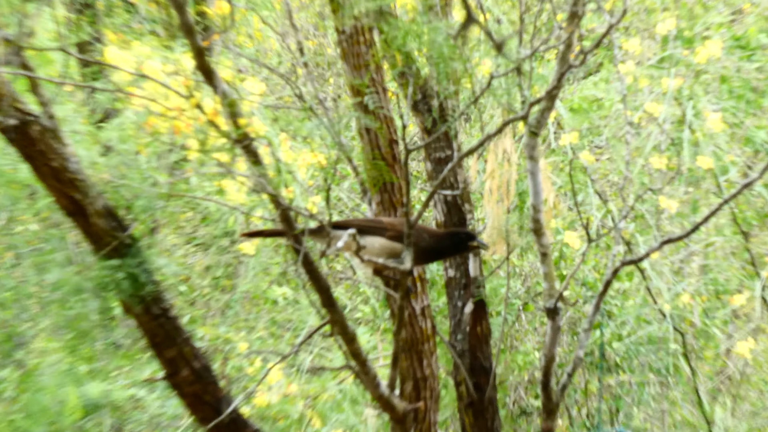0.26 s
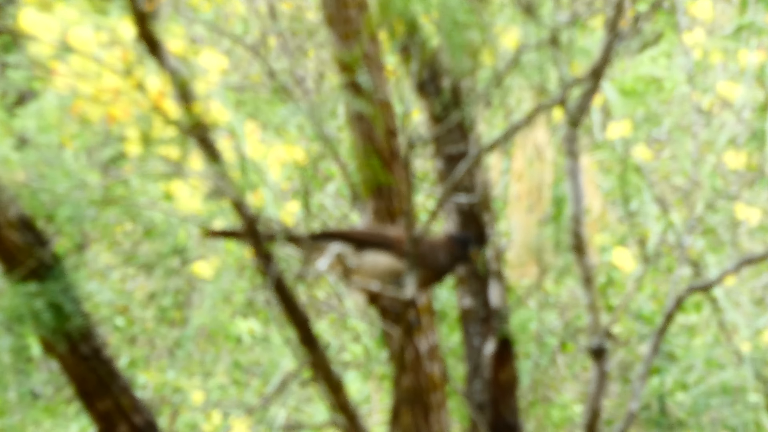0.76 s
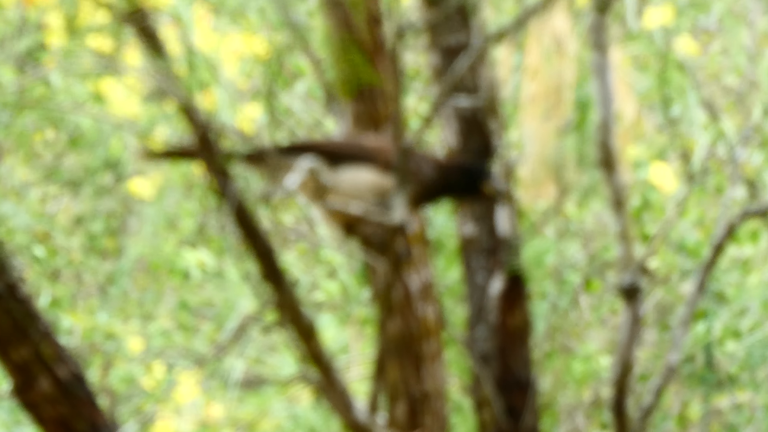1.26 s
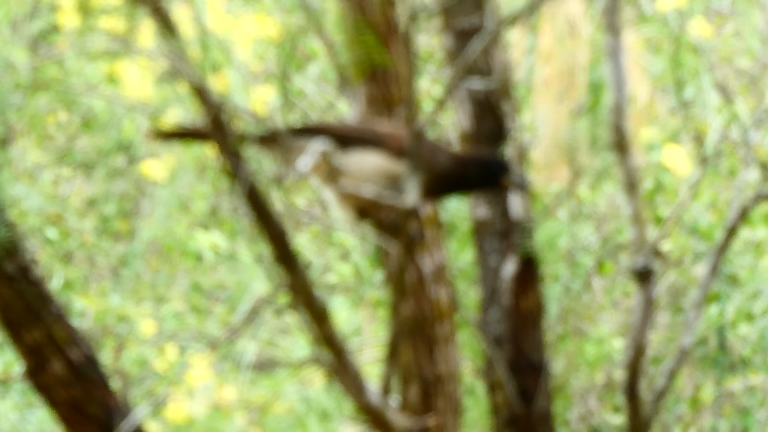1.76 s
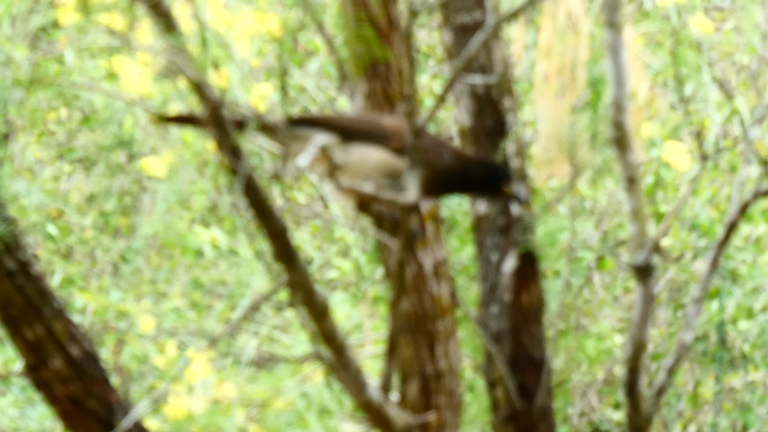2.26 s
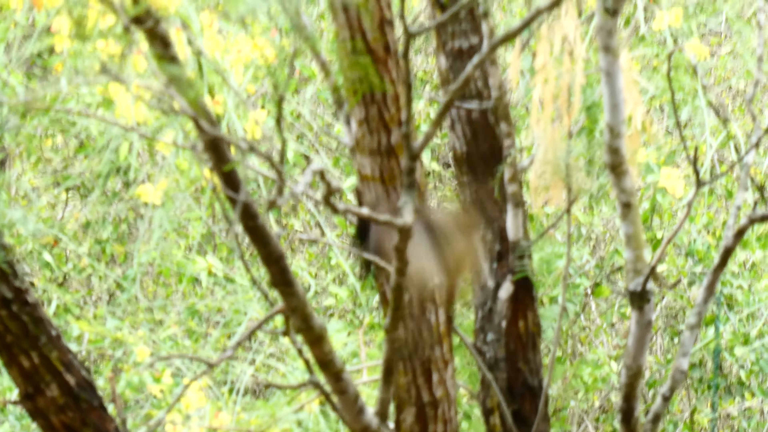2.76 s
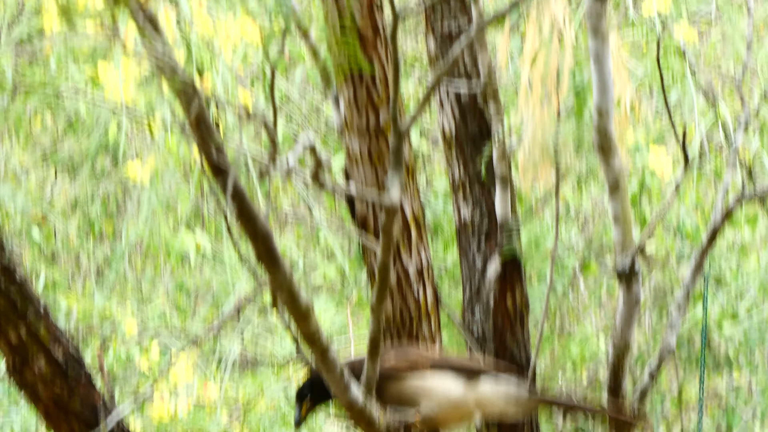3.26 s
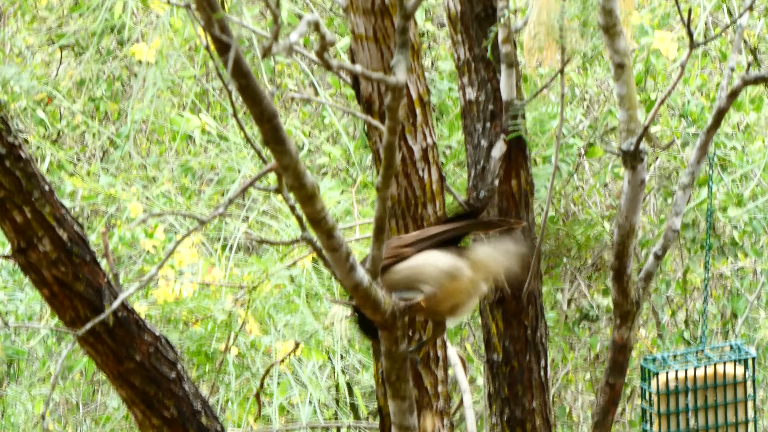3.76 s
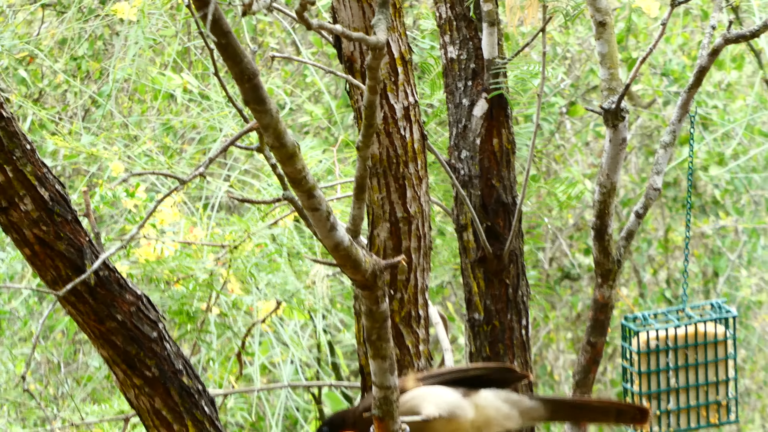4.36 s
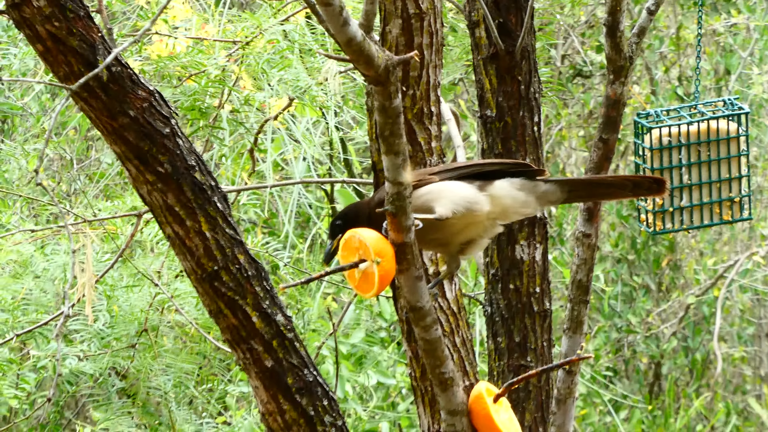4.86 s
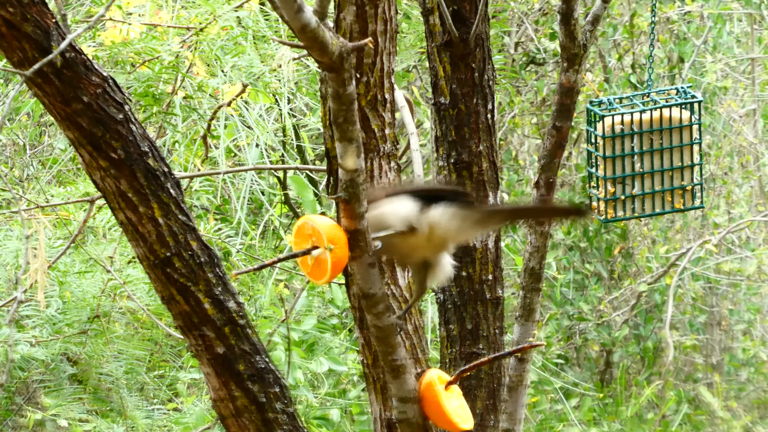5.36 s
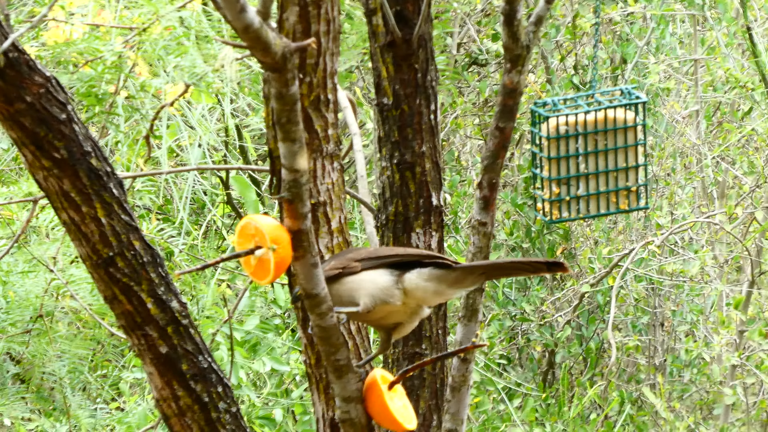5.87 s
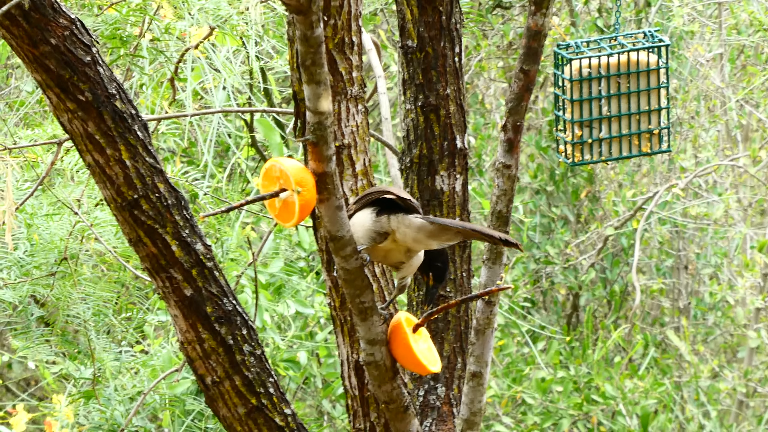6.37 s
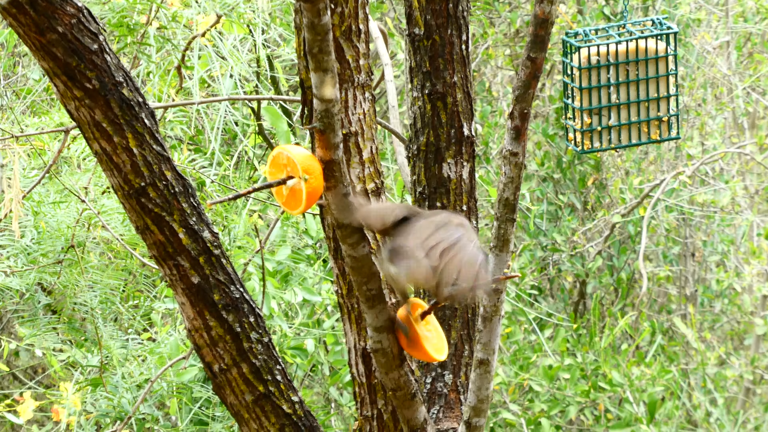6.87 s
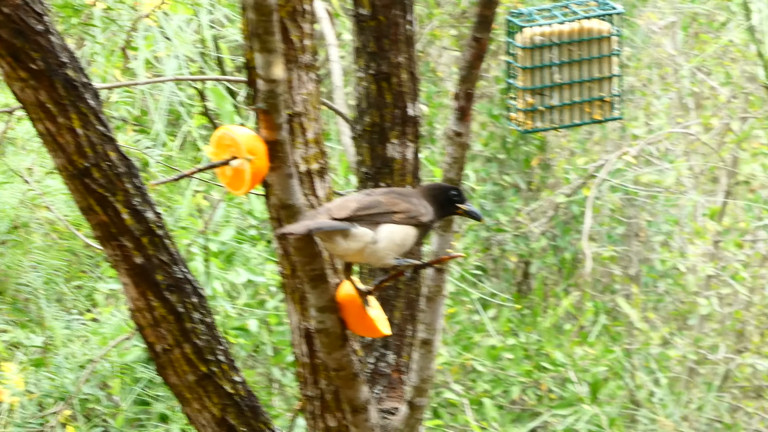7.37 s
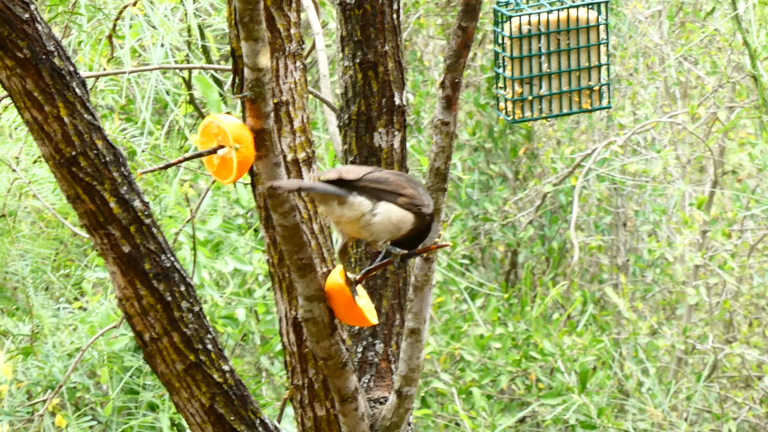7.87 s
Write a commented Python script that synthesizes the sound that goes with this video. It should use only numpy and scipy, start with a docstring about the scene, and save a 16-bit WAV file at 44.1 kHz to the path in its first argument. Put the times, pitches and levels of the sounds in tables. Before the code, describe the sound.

A jay screams harshly four times in a thicket, then hops with wing flutters and small knocks while distant songbirds chirp over soft hiss and hum.

```python
"""A jay in a thicket screams four times: a rasp, then a falling nasal note, then a growl, all one
harmonic stack that roughens and clears. It then hops about a feeder with flicks of its wings, made
of shaped noise, among ticks and knocks. Small songbirds, made of gliding sines, whistle farther off.
Filtered noise makes a soft hiss; noise and a wavering sine make a faint throbbing hum."""
import sys
import numpy as np
from scipy import signal
from scipy.fft import rfft, irfft, next_fast_len
from scipy.io import wavfile
from scipy.ndimage import uniform_filter1d, map_coordinates

SR = 44100
rng = np.random.default_rng(int(sys.argv[2]) if len(sys.argv) > 2 else 0)


def digitize_waveform(pressure):
    """Quantize a signal to 16-bit integers and store it at the path in sys.argv[1].

    Rows of a 2-D input are taken as channels; values are limited to [-1, 1].
    """
    field = np.atleast_2d(pressure).T
    bounded = np.clip(field, -1, 1)
    quanta = np.round(bounded * 32767).astype(np.int16)
    wavfile.write(sys.argv[1], SR, quanta)


N = 357651
TIME = np.arange(N) / SR


def amp(db):
    """Decibels to an amplitude factor."""
    return 10 ** (np.asarray(db) / 20)


def unit(x):
    """x at rms 1."""
    return x / np.sqrt(np.mean(x ** 2) + 1e-20)


def along(points, hz):
    """(hz, value) points read on a log frequency axis."""
    f, v = np.transpose(points)
    return np.interp(np.log(hz + 1), np.log(f + 1), v)


def over_time(points, t):
    """(time_s, value) points read at the times t."""
    s, v = np.transpose(points)
    return np.interp(t, s, v)


def wobble(rate, size):
    """Smooth random curve, rate knots a second."""
    knots = rng.standard_normal(size // 4)
    return map_coordinates(knots, [np.arange(size) * rate / SR], mode="wrap")


def turning(hz):
    """Phase in radians of a tone whose pitch is hz at each sample."""
    return 2 * np.pi * np.cumsum(hz) / SR


def filtered(x, response):
    """x times a response of frequency."""
    size = x.shape[-1]
    m = next_fast_len(size + 4096)
    return irfft(rfft(x, m) * response(np.fft.rfftfreq(m, 1 / SR)), m)[..., :size]


def coloured(x, spectrum):
    """x shaped by (hz, relative_db) points, at rms 1."""
    return unit(filtered(x, lambda hz: amp(along(spectrum, hz))))


def add(track, s, x):
    """Mix x into the track at time s."""
    part = track[max(round(s * SR), 0):][:len(x)]
    part += x[:len(part)]


def ramp(x, centre, width):
    """Rises from 0 to 1 over a width around the centre."""
    return np.clip((x - centre) / width + .5, 0, 1)


ATTACK_S, ATTACK_DB, ATTACK_SCOOP_SHARE = 0.043, 23.5, 0.12  # rise of the rasp's level and pitch
RASP_HZ = 1198.6  # reached at the end of the attack
STAGE_FLIP_S = 0.017
ROUGHNESS_DECAY_S = 0.014  # the rasp's roughness lingers into the note
NOTE_ARCH_HZ = 11.4  # the note holds its pitch at first, then sags faster
OPEN_AT_SHARE, OPEN_OVER_SHARE = 0.46, 0.41  # low resonance's entry, in shares of the note
SWELL_DB, SWELL_AT_SHARE, SWELL_WIDTH_SHARE = 5.5, 0.42, 0.17  # upper resonances' bloom in the note
GROWL_HZ, GROWL_SAG_HZ_PER_S, GROWL_FADE_DB_PER_S, GROWL_ROUGH = 892.6, 450, 82.5, 0.52
# balance of each stage, relative to its level: fundamental_db, low_db, middle_db, high_db
RASP_MIX = (-32, -0.2, -10.5, -4.5)
NOTE_START_MIX = (-14.5, -1.5, -4.5, -1.1)
NOTE_END_MIX = (-14, 2.6, -3.5, -9)
GROWL_MIX = (-13.5, -2.6, -12.5, -7.5)


def gesture(t, call, flicker_db=2.5, flicker_rate=80, drift=0.0041, lurch=0.0346):
    """Pitch, roughness and levels of a scream: swelling rasp, sagging note, fading growl."""
    (start, clear, crack, end, first_hz, last_hz, rasp_db, first_db, last_db, growl_db,
     held_db, lift_db, rasp_rough, note_rough) = call
    cleared = ramp(t, clear, STAGE_FLIP_S)
    broken = ramp(t, crack, STAGE_FLIP_S)

    def staged(rasp, note, growl):
        return rasp + cleared * (note - rasp) + broken * (growl - note)

    unready = np.clip(1 - (t - start) / ATTACK_S, 0, 1)
    u = np.clip((t - clear) / (crack - clear), 0, 1)  # progress through the note
    growling_s = t - crack

    note_hz = first_hz + u * (last_hz - first_hz) + NOTE_ARCH_HZ * np.sin(np.pi * u)
    rasp_hz = RASP_HZ * (1 - ATTACK_SCOOP_SHARE * unready)
    pitch = staged(rasp_hz, note_hz, GROWL_HZ - GROWL_SAG_HZ_PER_S * growling_s)

    lingering = np.exp(-np.maximum(t - clear, 0) / ROUGHNESS_DECAY_S)
    rough = staged(rasp_rough + unready, note_rough + rasp_rough * lingering, GROWL_ROUGH)

    rasp = np.add.outer(RASP_MIX, rasp_db - ATTACK_DB * unready)
    note = np.outer(np.add(NOTE_START_MIX, first_db), 1 - u) + np.outer(np.add(NOTE_END_MIX, last_db), u)
    note[1] -= held_db * (1 - ramp(u, OPEN_AT_SHARE, OPEN_OVER_SHARE))
    note[2:] += SWELL_DB * np.exp(-((u - SWELL_AT_SHARE) / SWELL_WIDTH_SHARE) ** 2)
    growl = np.add.outer(GROWL_MIX, growl_db - GROWL_FADE_DB_PER_S * growling_s)
    levels = staged(rasp, note, growl)
    levels[3] += lift_db

    # the rougher the voice, the more its pitch lurches about
    pitch = pitch * (1 + (drift + lurch * rough) * wobble(70.03, len(t)))
    return [pitch, rough] + [db + flicker_db * wobble(flicker_rate, len(t)) for db in levels]


# throat and beak response: hz, relative_db
THROAT = [(700, -82), (1300, 1), (1480, 3.5), (1800, 13.5), (2400, 10), (4400, 0.5), (5400, -9),
          (6800, -23.5), (8800, -15.5), (11500, -25), (15500, -42)]
# crossovers between neighbouring resonances: fade_from_hz, fade_to_hz
CROSSOVERS = [(2560, 2870), (3660, 3890)]


def scream(call, jitter=0.0467, jitter_rate=710, uneven_db=1.5, blur=0.015, half_share=0.66,
           rasp=0.59, growl_hz=105, growl_depth=0.52):
    """One call: a harmonic stack that doubles its period and breaks into a growl as it roughens."""
    start, _, _, end = call[:4]
    t = np.arange(max(start, 0), end, 1 / SR)
    size = len(t)
    pitch, rough, fundamental_db, *levels = gesture(t, call)
    rough = np.clip(rough, 0, 1)
    pitch = pitch * (1 + jitter * rough * wobble(jitter_rate, size) + 0.0076 * wobble(204, size))
    phase = turning(pitch)

    def overtone(k):
        """Partial k wanders and comes and goes on its own; upper ones blur into bands."""
        wander = (blur * k ** 2 + 0.58 * k * rough) * wobble(222.6, size)
        return np.sin(k * phase + wander) * amp(uneven_db * min(k / 4, 1) * wobble(71.5, size))

    stack = sum(overtone(k) + half_share * rough * overtone(k + .5) for k in range(2, 16))
    hiss = rng.standard_normal(size) * (1 + np.cos(phase))  # turbulence comes once a cycle
    growl_phase = turning(growl_hz * (1 + 0.154 * wobble(59.3, size)))
    growl = 1 + growl_depth * rough * np.sin(growl_phase)
    voice = coloured((unit(stack) + rasp * (rough ** 2 + 0.032) * hiss) * growl, THROAT)

    # the beak's opening shares the overtones among the resonances
    below = [filtered(voice, lambda hz: np.interp(hz, edge, [1, 0])) for edge in CROSSOVERS]
    bands = np.diff([np.zeros(size), *below, voice], axis=0)
    sound = np.zeros(size)
    for band, db in zip(bands, levels):
        running_rms = np.sqrt(np.abs(uniform_filter1d(band ** 2, size=700)) + 1e-9)
        sound += amp(db) * band / running_rms
    # the weak, fairly pure fundamental skips the resonances, slightly flat of the stack
    sound = sound + np.sqrt(2) * amp(fundamental_db) * overtone(0.97) * growl
    return sound * np.clip((t - t[0]) / 0.00061, 0, 1) * np.clip((t[-1] - t) / 0.059, 0, 1)


# screams: start_s (negative: already under way), clear_s, crack_s (into the growl), end_s,
# first_hz, last_hz (of the note), rasp_db, first_db, last_db (of the note), growl_db,
# held_db (low resonance kept down early in the note), lift_db (high resonance),
# rasp_rough, note_rough (0-1)
SCREAMS = [(-0.06, 0.044, 0.176, 0.43, 1108, 1012, -28, -34, -33.5, -33.5, 22, 1, 0.17, 0.059),
           (0.725, 0.805, 0.988, 1.032, 1027, 919, -31.5, -37.5, -39, -41, 13, 0, 0.51, 0.11),
           (1.272, 1.342, 1.474, 1.7, 1117, 987, -32, -36, -30, -32, 10, 1.5, 0.53, 0.084),
           (1.876, 1.965, 2.076, 2.24, 1026, 980.4, -27, -37, -28.5, -32, -2, -0.5, 0.4, 0.072)]


def jay():
    """The jay's voice: four screams."""
    out = np.zeros(N)
    for call in SCREAMS:
        add(out, call[0], scream(call))
    return out


THROB_HZ, THROB_WANDER_HZ = 11.44, 0.3
# hum level before hum_db: time_s, level_db
HUM_LEVEL = [(0.0, -57.5), (0.8, -62), (2.81, -54), (6.3, -58), (8.0, -52)]
# noise part of the hum: hz, relative_db
HUM_BAND = [(450, -63), (580, -9.5), (660, -1.5), (700, -2.5), (760, 0), (830, -24.5), (950, -89)]
# throb swing either way: time_s, depth_db
THROB_DEPTH = [(0, 4.5), (2, 6.5), (5, 3.5), (6.5, 3.5)]


def hum(line_hz=695, line_db=1, hum_db=-1, waver_db=0.9):
    """A fuzzy tone near 700 Hz, band noise plus a sine, that wavers and throbs about 11 times a second."""
    rate = THROB_HZ + THROB_WANDER_HZ * wobble(2.14, N)
    swing_db = over_time(THROB_DEPTH, TIME) * np.cos(turning(rate))
    throb = unit(amp(swing_db + waver_db * wobble(6, N)))
    line = np.sin(turning(line_hz + 20 * wobble(50, N)))
    tone = unit(coloured(rng.standard_normal(N), HUM_BAND) + amp(line_db) * line)
    return amp(over_time(HUM_LEVEL, TIME) + hum_db) * throb * tone


# hiss spectra: hz, relative_db
AIR_LOW = [(25, -58), (45, -39), (70, -29.5), (160, -3.5), (260, -6), (400, 3.5), (520, 7.5), (850, 5),
           (1080, -1.5), (1230, 5), (1450, -5), (1900, -4.5), (2300, -19)]
AIR_HIGH = [(1600, -11), (2100, 4.5), (2900, 2.5), (3600, -6), (4600, -2), (5500, 5), (6400, -5),
            (7100, -1.5), (8000, 4.5), (8700, 6.5), (9700, -4), (12500, -9), (15500, -13.5)]
# left-right likeness of the hiss: hz, correlation
ALIKE = [(60, -0.053), (110, 0.28), (200, -0.46), (380, 0.23), (700, 0.49), (1290, 0.56), (2380, 0.84),
         (4400, 0.97), (8120, 0.96), (15000, 0.19)]


def air(spectrum):
    """Steady stereo noise of rms 1; the mid-side balance sets the ears' likeness."""
    mid, side = rng.standard_normal((2, N))

    def turn(hz):
        return np.arccos(np.clip(along(ALIKE, hz), -1, 1)) / 2

    mid = filtered(mid, lambda hz: np.cos(turn(hz)))
    side = filtered(side, lambda hz: np.sin(turn(hz)))
    return coloured(np.array([mid + side, mid - side]), spectrum)


# small sharp ticks: start_s, level_db (before trim_db), ring_hz
TICKS = [(0.4225, -46.5, 10600), (0.6162, -44, 10300), (1.1723, -46.5, 9900), (4.3214, -54, 10300),
         (5.881, -50, 9700), (5.996, -33, 9200)]


def ticks(t60=0.0096, trim_db=1):
    """Bright ticks of beak and claws: decaying noise peaked at the ring."""
    out, t = np.zeros(N), np.arange(SR // 10) / SR
    for s, db, hz in TICKS:
        peak = [(hz / 2, -24), (hz * 0.9, -20), (hz, 0), (hz * 1.33, -2), (hz * 1.6, -22)]
        ring = coloured(rng.standard_normal(len(t)), peak)
        add(out, s, amp(db + trim_db - 60 * t / t60) * ring)
    return out


def whistle(pitch, waver_db=3, waver=0.011):
    """A thin, unsteady sine that swells and fades."""
    size = len(pitch)
    swell = np.sqrt(np.abs(np.sin(np.linspace(0, np.pi, size))))
    tone = np.sin(turning(pitch * (1 + waver * wobble(153.0, size))))
    return swell * amp(waver_db * wobble(101, size)) * tone


FLUTTER_HZ, FLUTTER_DB, FLUTTER_PITCH_SHARE = 62.4, 3.5, 0.02
# short notes: start_s, length_s, start_hz, end_hz, level_db (before the far mix)
NOTES = [(0.55, 0.033, 5300, 4000, -51), (2.236, 0.06, 5320, 4160, -56), (2.36, 0.088, 4200, 4000, -51),
         (2.596, 0.031, 3070, 3010, -49.5), (2.823, 0.084, 2440, 3330, -53),
         (2.983, 0.09, 3700, 3900, -64.5), (3.259, 0.034, 3350, 2830, -52.5),
         (3.364, 0.11, 2960, 3032, -54.5), (3.789, 0.14, 2876, 2620, -55.5),
         (4.286, 0.052, 3260, 3450, -58), (4.366, 0.082, 3500, 3500, -57.5), (5.15, 0.08, 3140, 3010, -62),
         (5.935, 0.087, 2723, 1995, -53.5), (6.806, 0.066, 2136, 3350, -52.5)]


def fluttering_notes():
    """Songbird notes whose pitch and level flutter together."""
    out = np.zeros(N)
    for s, length, start_hz, end_hz, db in NOTES:
        flutter = np.sin(2 * np.pi * FLUTTER_HZ * TIME[:int(length * SR)])
        glide = np.geomspace(start_hz, end_hz, len(flutter))
        add(out, s, amp(db + FLUTTER_DB * flutter) * whistle(glide * (1 + FLUTTER_PITCH_SHARE * flutter)))
    return out


OPENING_GAP_S, OPENING_DB = 0.0115, -3.5
LEAP_AFTER_S, STROKE_S, STROKE_LOSS_DB = 0.0945, 0.0245, 0.64


def hop(s, db, count=5):
    """(start_s, level_db) snaps of one hop: the wings open, then beat ever more weakly."""
    opening = [(s, db + OPENING_DB), (s + OPENING_GAP_S, db + OPENING_DB)]
    strokes = [(s + LEAP_AFTER_S + k * STROKE_S, db - k * STROKE_LOSS_DB) for k in range(count)]
    return opening + strokes


# lone wing flicks: start_s, level_db (before trim_db)
FLICKS = [(0.6715, -40), (0.985, -30.5), (1.0676, -41), (1.238, -43), (6.0168, -42)]
# hops: start_s, level_db (of the first stroke, before trim_db)
HOPS = [(6.407, -31.2), (7.037, -32), (7.639, -33)]
# feather noise: hz, relative_db
FEATHER = [(300, -24), (900, 5), (1400, 0), (1900, 7.5), (4500, -3.5), (5400, 9), (7200, -5.5),
           (9500, -4.5), (15000, -13)]


def wings(t60=0.016, rustle_db=-11.5, rustle_t60=0.14, trim_db=-5.0):
    """Each flick is a snap of feathers and a short rustle: noise with a fast and a slow decay."""
    out, t = np.zeros(N), np.arange(SR // 8) / SR
    decay = amp(-60 * t / t60) + amp(rustle_db - 60 * t / rustle_t60)
    shape = decay * (1 - np.exp(-t / 0.0015))
    for s, db in FLICKS + [snap for row in HOPS for snap in hop(*row)]:
        add(out, s, amp(db + trim_db) * shape * coloured(rng.standard_normal(len(t)), FEATHER))
    return out


BUZZ_STROKES_PER_S = 40  # trills slower than this get a rising grace note
LEAD_S, LEAD_FROM_HZ, LEAD_TO_HZ, LEAD_DB = 0.067, 2480, 3530, -2.5
# trills: start_s, strokes_per_s, length_s, start_hz, middle_hz, end_hz, fall_hz,
# fade_db (within a stroke), level_db (mid-stroke, before the far mix)
TRILLS = [(2.343, 65, 0.19, 2925, 3497, 2650, 450, 12, -46),
          (5.359, 20, 0.24, 2257, 2273, 2423, 1153, 9, -50.5),
          (6.266, 21.2, 0.23, 2200, 2300, 2400, 1247, 5, -48),
          (7.262, 21.2, 0.24, 2250, 2197, 2140, 1298, 12.5, -49.5)]


def trills(upper_hz=800, upper_db=-10, fall=0.3):
    """Runs of down-strokes sung with both sides of the syrinx: two whistles upper_hz apart."""
    out = np.zeros(N)
    for s, rate, length, start_hz, middle_hz, end_hz, fall_hz, fade_db, db in TRILLS:
        if rate < BUZZ_STROKES_PER_S:
            grace = whistle(np.geomspace(LEAD_FROM_HZ, LEAD_TO_HZ, int(LEAD_S / 2 * SR)))
            add(out, s - LEAD_S, amp(db + LEAD_DB) * grace)
        arch = np.polyfit([0, .5, 1], [start_hz, middle_hz, end_hz], 2)
        u = np.linspace(0, 1, int(SR / rate))
        # each stroke drops quickly, softens, and hooks up towards the next
        bend = fall_hz * (np.exp(-u / fall) + .5 * u ** 6)
        for at in np.arange(0, length, 1 / rate):
            pitch = np.polyval(arch, at / length) + bend + 50 * rng.standard_normal()
            stroke = whistle(pitch) + amp(upper_db) * whistle(pitch + upper_hz)
            add(out, s + at, amp(db + fade_db * (.5 - u)) * stroke)
    return out


SLUR_S, SLUR_OCTAVES_PER_S = 0.085, 12.8
# steep down-slurs: start_s, top_hz, level_db (before the far mix)
SLURS = [(3.963, 6950, -61), (4.392, 6950, -62), (4.688, 6950, -61), (4.94, 7050, -62.5),
         (5.173, 7050, -63), (5.606, 6400, -63), (5.823, 6010, -58), (6.738, 5250, -57),
         (7.851, 5440, -55.5)]


def slurs():
    """A songbird's whistles falling at a steady rate in octaves."""
    out, t = np.zeros(N), np.arange(int(SLUR_S * SR)) / SR
    for s, top_hz, db in SLURS:
        add(out, s, amp(db) * whistle(top_hz * 2 ** (-SLUR_OCTAVES_PER_S * t)))
    return out


# soft knocks on wood: start_s, ring_hz, level_db
KNOCKS = [(5.884, 920, -34.5), (6.347, 460, -38)]


def knocks(t60=0.018):
    """Dull knocks of beak and claws: decaying sines with a soft onset."""
    out, t = np.zeros(N), np.arange(SR // 10) / SR
    for s, hz, db in KNOCKS:
        add(out, s, amp(db - 60 * t / t60) * np.sin(2 * np.pi * hz * t) * (1 - np.exp(-t / 0.0018)))
    return out


# decay of the scattered sound: hz, t60_s
THICKET = [(500, 0.17), (3000, 0.56), (6000, 0.4), (12000, 0.38)]
# its difference between the ears: hz, side_share
SPREAD = [(600, 0.28), (4000, 0.071), (9000, 0.63)]


def thicket(x, echo_s, echo_width_s, echo_gain):
    """Trunks scatter the sound; a farther line of trees sends back a blurred echo."""
    hz, t, z = signal.stft(rng.standard_normal((2, SR)), SR, nperseg=256)
    z[1] *= along(SPREAD, hz)[:, None]
    swell = 1 + echo_gain * np.exp(-((t - echo_s) / echo_width_s) ** 2)
    decay = amp(-60 * t / along(THICKET, hz)[:, None])
    mid, side = signal.istft(z * swell * decay, SR, nperseg=256)[1]
    tail = np.array([mid + side, mid - side]) / np.linalg.norm(mid)
    return signal.fftconvolve(x[None], tail, axes=1)[:, :N]


def scene():
    """Near jay and far songbirds, each with scattered sound, over hum and hiss."""
    near = jay() + ticks() + wings() + knocks()
    near = near + amp(-7.5) * thicket(near, echo_s=0.21, echo_width_s=0.0078, echo_gain=0.52)
    far = fluttering_notes() + trills() + slurs()
    far = amp(-2.5) * far + amp(-1.5) * thicket(far, echo_s=0.2, echo_width_s=0.068, echo_gain=0.14)
    stereo_hum = hum() * amp([[-0.4], [0.4]])
    hiss = amp(-62.0) * air(AIR_LOW) + amp(-58.0) * air(AIR_HIGH)
    return near + far + stereo_hum + hiss


TOP_HZ = 15730


def record(dry):
    """Band limit: nothing from TOP_HZ up is kept."""
    return filtered(dry, lambda hz: hz < TOP_HZ)


dry = scene()
out = record(dry)
digitize_waveform(out)
```